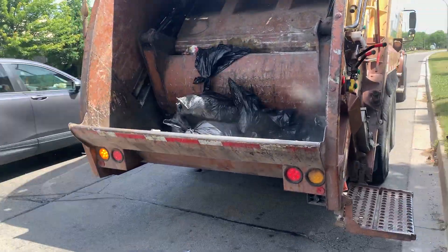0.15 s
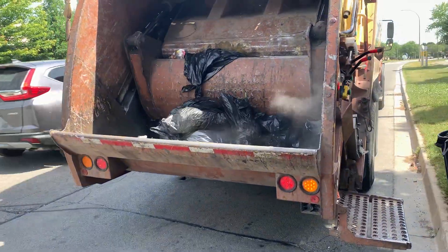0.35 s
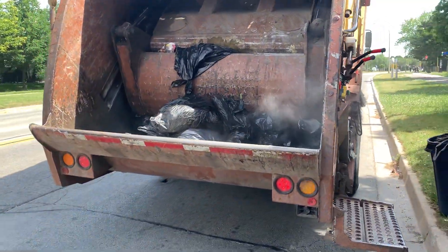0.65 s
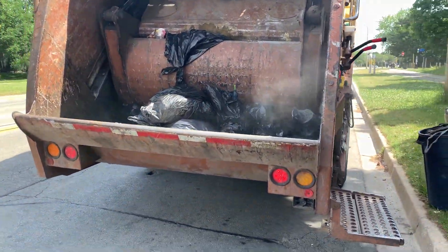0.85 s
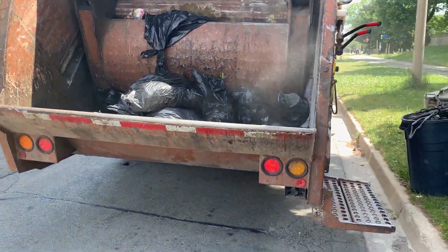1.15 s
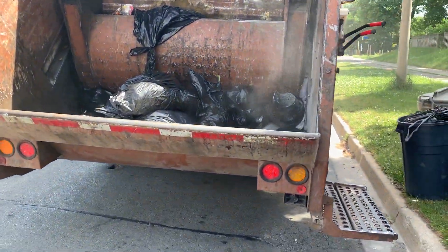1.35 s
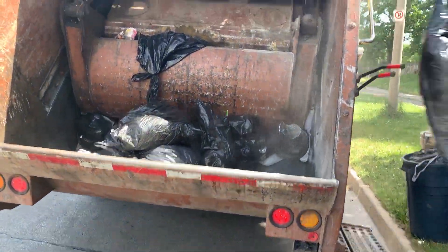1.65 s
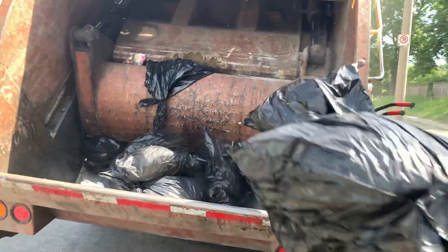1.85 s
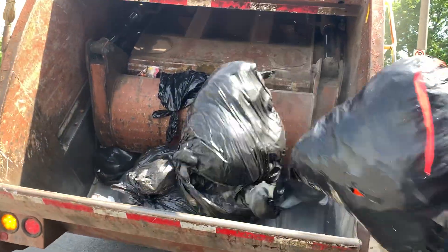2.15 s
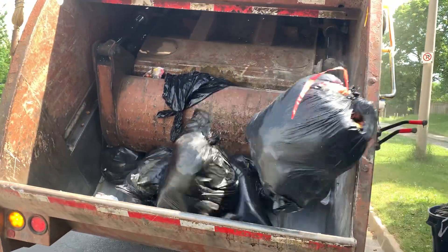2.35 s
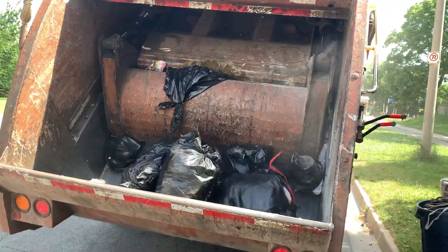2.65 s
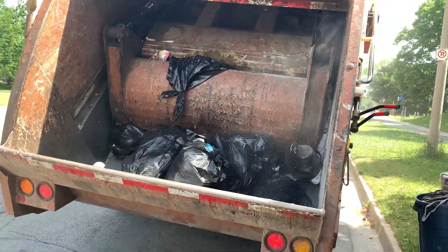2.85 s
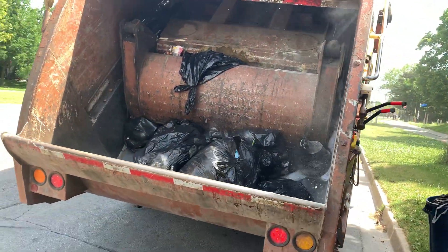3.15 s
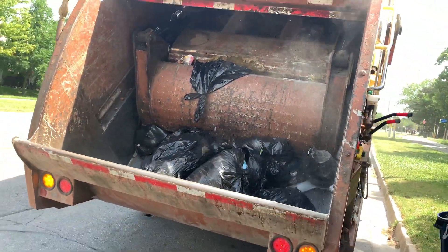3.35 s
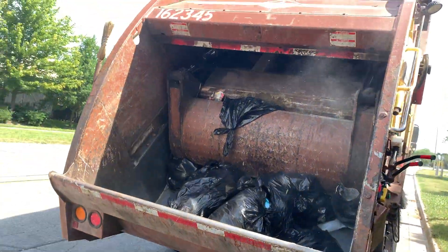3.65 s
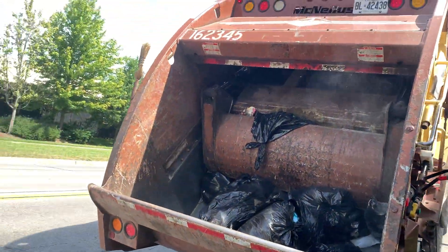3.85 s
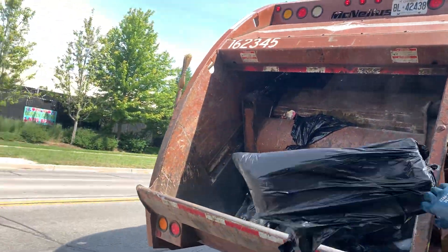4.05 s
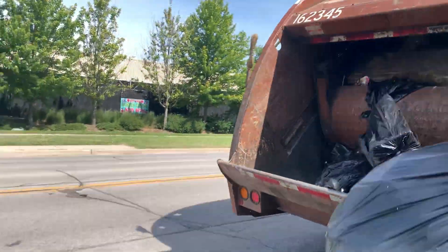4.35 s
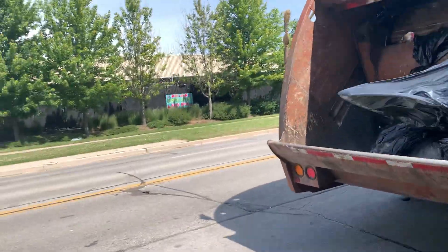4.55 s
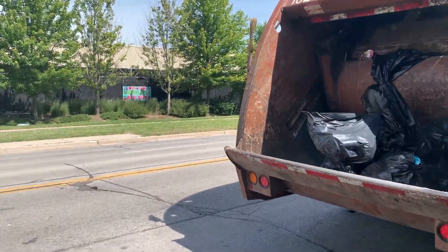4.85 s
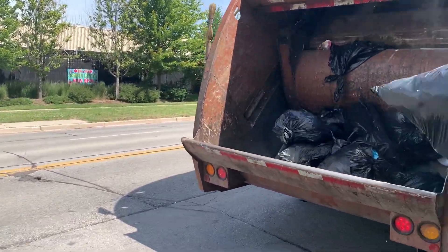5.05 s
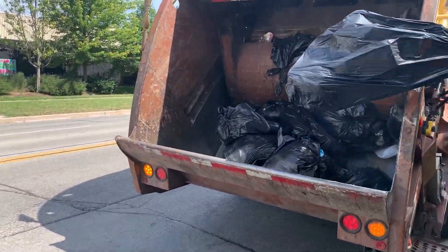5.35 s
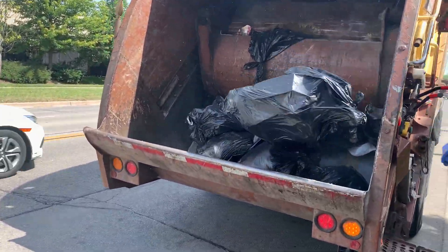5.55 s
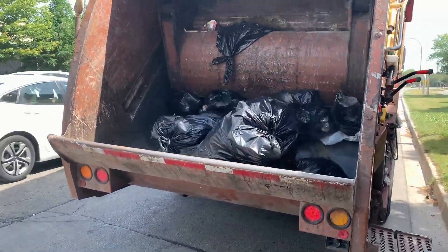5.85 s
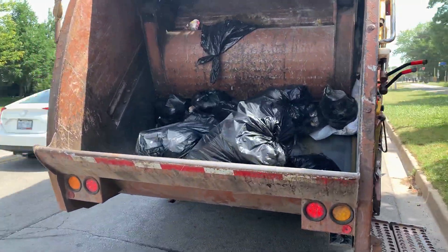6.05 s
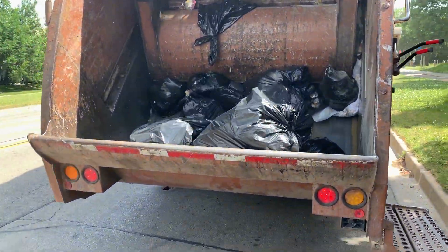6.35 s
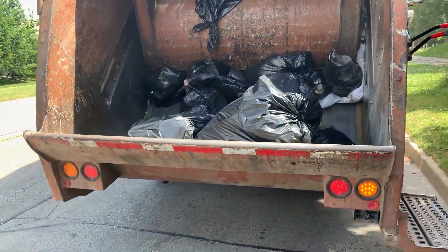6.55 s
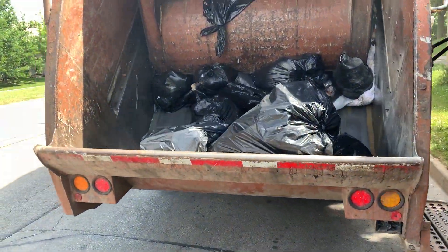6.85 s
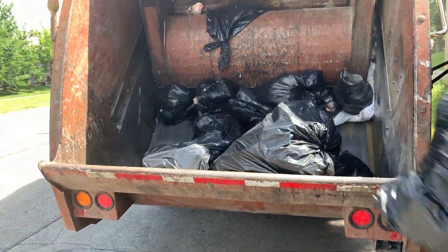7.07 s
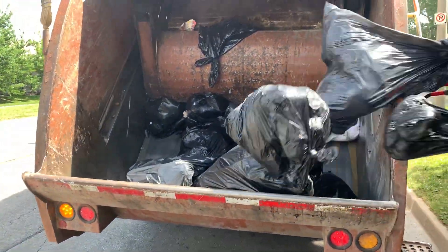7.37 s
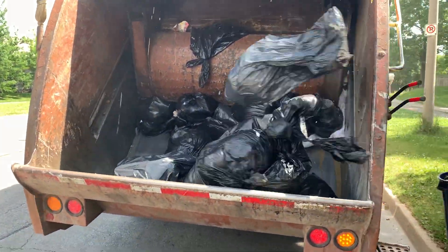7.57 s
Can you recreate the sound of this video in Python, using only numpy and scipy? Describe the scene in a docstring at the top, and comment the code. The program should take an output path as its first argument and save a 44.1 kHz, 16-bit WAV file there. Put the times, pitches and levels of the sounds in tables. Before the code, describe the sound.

Garbage truck engine hums steadily at raised revs outdoors while plastic bags rustle, thud and crunch in a steel hopper, with one brief falling metal squeal.

```python
"""Behind a rear-loading refuse truck, a diesel at raised revs drives a humming pump and a fan: partials of one shaft.
From the outset plastic bags rustle and snap as grains of noise; thrown rubbish soon thuds and crunches
in the steel hopper, as decaying noise and struck resonances.
Next, rubbing on the steel gives one falling stick-slip squeal among short chirps, as gliding tones.
The blows and snaps go on to the end, where the revs sag."""
import sys
import numpy as np
from scipy import signal
from scipy.fft import rfft, irfft, next_fast_len
from scipy.io import wavfile
from scipy.ndimage import uniform_filter1d, map_coordinates

SR = 44100
rng = np.random.default_rng(int(sys.argv[2]) if len(sys.argv) > 2 else 0)


def bounce(signal):
    """Save signal as a 16-bit WAV file at the path given by the first command-line argument."""
    frames = np.transpose(np.atleast_2d(signal))
    limited = np.clip(frames, -1, 1)
    pcm = np.round(limited * 32767).astype(np.int16)
    wavfile.write(sys.argv[1], SR, pcm)


N = 340011

# All levels in the tables are relative: each layer also has a trim of its own.
# Shaft speed, steady and then sagging: (time [s], pump tone [Hz])
SHAFT_SPEED = [(0, 201.2), (1.22, 199.6), (1.63, 200.4), (7.21, 201.3), (7.6, 198.1), (7.71, 191.4)]
# Hum of the driven machines: (time [s], pump level [dB], fan level [dB])
HUM_LEVELS = [(0, -21, -32), (.7, -23, -29), (.95, -26, -39), (1.3, -20, -30), (1.8, -15, -25.5),
              (2.36, -15, -24.5), (2.7, -22, -33), (3.55, -25.5, -45), (4.05, -22, -35), (4.6, -22, -39),
              (5, -19, -32), (6.05, -16, -42), (6.4, -17.5, -24), (6.9, -15.5, -23), (7.35, -18.5, -21.5),
              (7.52, -15, -32), (7.71, -36, -18.5)]
# Broad noise: (time [s], exhaust rumble level [dB], roar of machine and street level [dB])
DRONE_LEVELS = [(0, -24, -28), (1, -22, -27), (1.6, -21.5, -25.5), (2.35, -22.5, -29.5), (2.7, -28.5, -33),
                (3.55, -28.5, -35), (3.85, -29, -32.5), (4.1, -24.3, -33), (5.2, -25.5, -29.5),
                (5.95, -24, -25), (6.6, -22.5, -29.5), (7.35, -21, -29.5), (7.71, -20, -23)]
# Rubbish striking the hopper: (time [s], crunch level [dB], steel body level [dB], fizz level [dB])
HOPPER_BLOWS = [(1.1026, -17, -36, -23), (1.4755, -12, -27.5, -29.5), (1.7669, -10.5, -35, -26),
                (1.821, -18, -22, -21.5), (2.4243, -11.5, -20, -26), (2.8074, -16, -25, -30),
                (2.8727, -17, -29, -33), (3.004, -14, -28.5, -26), (3.6484, -11, -15, -44),
                (3.7809, -16.5, -28, -26.5), (3.95, -22, -32, -42), (4.9067, -19, -20, -38),
                (5.277, -15.5, -24, -40), (5.7162, -12.5, -21, -18.5), (6.6566, -15.5, -39, -22),
                (6.944, -15.5, -46, -30), (7.2436, -18, -25, -36), (7.4995, -18, -35, -28),
                (7.594, -20, -24, -32)]
# Creases of plastic snapping: (time [s], crack level [dB], bright tick level [dB])
CREASE_SNAPS = [(.241, -22, -31.5), (.275, -16, -32), (0.454, -32, -29), (.8612, -24, -38),
                (0.8687, -16, -22.5), (1.235, -16.5, -29), (1.7669, -15, -40), (2.049, -27, -30),
                (4.3164, -17.5, -25.5), (5.0698, -17, -31), (5.2778, -6.5, -18), (6.099, -17, -29.5),
                (6.2593, -16.5, -31), (6.344, -28, -32), (6.356, -24, -30), (6.4014, -12.5, -23),
                (6.6579, -14, -22.5), (6.7115, -10, -26), (6.982, -13, -26), (7.037, -14.5, -26),
                (7.4995, -8, -18.5), (7.5264, -16, -29)]
# Struck contents, from thuds to clinks: (time [s], level [dB], resonance [Hz])
STRUCK_CONTENTS = [(.855, -25, 980), (1.076, -23, 160), (1.767, -26, 2960), (2.166, -14, 99),
                   (2.425, -17.5, 4100), (3.652, -23, 1050), (3.652, -23, 1700), (4.02, -19.5, 340),
                   (4.909, -18, 1060), (5.277, -18, 544), (6.044, -29, 2700), (6.959, -29, 4900),
                   (7.262, -31, 103), (7.3, -15.5, 285), (7.52, -11.5, 92), (7.568, -11.5, 710),
                   (7.583, -17.5, 1070)]
# Exhaust partials: (multiple of the firing rate [1], level [dB])
FIRING_PARTIALS = [(1, -7), (4 / 3, -23), (2, -13), (2.5, -6.5), (4, -19)]
# Pump partials: (multiple of the pump tone [1], level [dB])
PUMP_PARTIALS = [(1, -0.5), (2, -19), (3, -40.5), (4, -35)]
# Fan partials: (multiple of the fan tone [1], level [dB])
FAN_PARTIALS = [(1, 3), (2, -10), (3, -18.5)]
# Spectrum of the exhaust rumble: (frequency [Hz], density [dB per Hz])
RUMBLE_SPECTRUM = [(20, -47), (32, -17), (50, -8.5), (62, -4), (90, 0), (125, -1), (165, 3.5), (215, -3.5),
                   (255, -8.5), (320, -13.5), (380, -7.5), (480, -16.5), (700, -40), (1500, -55)]
# Spectrum of the machine and street roar: (frequency [Hz], density [dB per Hz])
ROAR_SPECTRUM = [(150, -15), (300, 1), (400, 7), (520, 0.5), (780, 1), (1000, 1), (1300, -4), (1700, -13.5),
                 (3000, -25.5), (6000, -32), (16000, -48)]
# Spectrum of crumpling, crunching and snapping: (frequency [Hz], density [dB per Hz])
CRUMPLE_SPECTRUM = [(500, -39), (1300, 1), (2100, 3.5), (3800, -1), (5200, -6.5), (7500, -8), (11000, -17),
                    (16000, -27)]
# Spectrum of sliding hiss, fizz and ticks: (frequency [Hz], density [dB per Hz])
SLIDE_SPECTRUM = [(2000, -25), (4500, -2), (6500, 0), (8500, 3), (10200, 4), (12500, 0.5), (15500, -1),
                  (16500, -19)]
# Modes of the hopper's steel: (centre [Hz], width [Hz], level [dB])
HOPPER_MODES = [(307, 47, 3.5), (600, 99, -2), (780, 151, -0.5), (1060, 260, -1.5), (1306, 160, -1.5),
                (1680, 340, -12)]
# Decay of the hopper's echo: (frequency [Hz], t60 [s])
HOLLOW_DECAY = [(200, 0.61), (1500, 0.093), (6000, 0.12), (15000, 0.073)]
# Correlation of the two sides: (frequency [Hz], left-right likeness [1])
SIDE_LIKENESS = [(60, 1), (200, 0.87), (350, 0.89), (640, 0.42), (1300, -0.22), (3000, 0.038),
                 (5500, -0.0022), (8300, 1), (15000, 0.7)]
# Phase between the two microphone ports: (frequency [Hz], lead of the left [rad])
PORT_PHASE = [(20, 0), (6200, 0), (8600, -3.14), (11000, -6.28), (13450, -9.42), (15900, -12.57)]
# Strokes of sliding, crumpling bags: (middle [s], half length [s], crumple level [dB], hiss level [dB])
BAG_STROKES = [(0.015, 0.044, -46, -37.5), (0.327, 0.066, -52, -45), (.475, 0.033, -54, -40),
               (1.08, 0.17, -39.5, -38), (1.653, 0.26, -44, -41.5), (2.159, 0.034, -32, -28),
               (2.386, 0.055, -30, -26), (2.57, 0.081, -46, -33), (2.893, 0.093, -41, -38),
               (3.077, 0.082, -38, -25.5), (3.85, 0.022, -35.5, -47), (4.07, 0.11, -40, -39),
               (4.49, 0.069, -36.5, -35), (4.72, 0.15, -40.5, -48), (4.99, 0.08, -31, -30),
               (5.2, 0.044, -32.5, -41), (5.55, 0.081, -35, -44), (5.73, 0.051, -32.5, -36),
               (6.071, 0.044, -49, -48), (6.41, 0.092, -37, -41), (6.902, 0.19, -39, -62),
               (7.522, 0.041, -27, -30), (7.683, 0.09, -32.5, -31)]
# The main squeal: (time [s], pitch [Hz], level [dB])
MAIN_SQUEAL = [(2.566, 7780, -21), (2.594, 6850, -20.5), (2.648, 7710, -29), (2.72, 7250, -23.5),
               (2.77, 6570, -24.5), (2.879, 6080, -34), (2.99, 5730, -17.5), (3.03, 5550, -32),
               (3.13, 4050, -35)]
# Brief slips at other contacts: (time [s], length [s], first pitch [Hz], last pitch [Hz], level [dB])
CONTACT_CHIRPS = [(2.308, 0.074, 5900, 7280, -31.5), (2.363, 0.1, 9000, 8800, -16),
                  (2.456, 0.061, 8700, 8840, -17), (2.503, 0.063, 8700, 10200, -19),
                  (2.509, 0.047, 8600, 7850, -20.5), (2.545, 0.053, 9540, 8560, -13),
                  (2.557, 0.032, 11900, 12300, -24), (2.627, 0.051, 10750, 9200, -25),
                  (2.68, .06, 12300, 11900, -35.5), (2.747, 0.15, 11700, 11130, -27),
                  (2.92, .04, 12550, 9900, -29), (2.969, 0.045, 7770, 5750, -23),
                  (3.029, 0.13, 10900, 6670, -22.5), (3.057, 0.3, 13050, 6590, -19)]

TOP_HZ = 16100  # band limit
# steady treble of the running machine: middle and top level, and dB gained per dB of roar
FLOOR_MID_DB, FLOOR_TOP_DB, FLOOR_FOLLOWS = -40, -45, 0.42
CRUNCH_T60_S, BODY_T60_S, FIZZ_T60_S = 0.12, 0.14, 0.13
SNAP_T60_S, TICK_T60_S = 0.025, 0.01
RING_T60_S, RING_FALL = 0.17, 0.19  # t60 at 1 kHz; power by which it shortens with pitch
CHIRP_SETTLE, CHIRP_FADE_DB_PER_S = 2.5, 99  # time constants of the glide within one chirp; loss of level
SQUEAL_DRIFT, DRIFT_PER_S = 0.00496, 60  # uneven rubbing bends the pitch: share of the pitch, bends a second


def shaft_turns():
    """Phase is the integral of frequency: cycles of the pump tone."""
    pump_hz, = curves(SHAFT_SPEED)
    return np.cumsum(pump_hz) / SR


def pump_and_fan(pump_turns):
    """Harmonic series of rotation: the pump, and a belted fan at a fixed ratio to it."""
    pump_db, fan_db = curves(HUM_LEVELS)
    fan_turns = pump_turns * 1.1527
    pump = amp(pump_db - 0.05) * tone(pump_turns, PUMP_PARTIALS, waver_db=.5)
    fan = amp(fan_db - 5) * tone(fan_turns, FAN_PARTIALS, waver_db=2.5)
    return np.sqrt(2) * (pump + fan)


def exhaust(pump_turns):
    """Periodic firing: partials of the firing rate, with noise modulated into puffs, one for each firing."""
    rumble_db, _ = curves(DRONE_LEVELS)
    firings = pump_turns / 3
    beat = amp(rumble_db - 6.0) * tone(firings, FIRING_PARTIALS, waver_db=2.5)
    puffs = 1 + 0.21 * np.cos(2 * np.pi * firings)
    rumble = amp(rumble_db + 1.24) * coloured(noise() * puffs, RUMBLE_SPECTRUM)
    return np.sqrt(2) * beat + spread(rumble)


def rubbish():
    """Impact excitation: clusters of small contacts also ring the hopper's modes; creases snap on their own."""
    grain = unit(5 + 0.67 * crackle(rate=510, size_db=19, life=0.00086))
    crunch_rows = [(s, db) for s, db, _, _ in HOPPER_BLOWS]
    body_rows = [(s, db) for s, _, db, _ in HOPPER_BLOWS]
    fizz_rows = [(s, db) for s, _, _, db in HOPPER_BLOWS]
    snap_rows = [(s, db) for s, db, _ in CREASE_SNAPS]
    tick_rows = [(s, db) for s, _, db in CREASE_SNAPS]
    body = blows(body_rows, BODY_T60_S) * unit(resonant(noise(), HOPPER_MODES))
    crunch_noise = coloured(patchy(depth_db=5) * grain, CRUMPLE_SPECTRUM)
    crunch = amp(-9.0) * blows(crunch_rows, CRUNCH_T60_S) * crunch_noise
    fizz = amp(-5.0) * blows(fizz_rows, FIZZ_T60_S) * coloured(noise() * grain, SLIDE_SPECTRUM)
    snap = amp(-8.5) * blows(snap_rows, SNAP_T60_S) * coloured(noise(), CRUMPLE_SPECTRUM)
    tick = amp(10) * blows(tick_rows, TICK_T60_S) * coloured(noise(), SLIDE_SPECTRUM)
    return spread(body + crunch + fizz + snap + tick)


def thuds():
    """Damped resonance: struck contents boom or clink; low ones start softly and ring longer."""
    out, t = np.zeros((2, N + SR)), np.arange(SR // 2) / SR
    for s, db, hz in STRUCK_CONTENTS:
        t60 = RING_T60_S * (hz / 10 ** 3) ** -RING_FALL
        mode = (hz, 55 + hz * 0.075, 0)
        boom = unit(resonant(rng.standard_normal((2, len(t))), [mode]))
        onset = 1 - np.exp(-t * hz)
        out[:, round(s * SR):][:, :len(t)] += boom * amp(db - 60 * t / t60) * onset
    return spread(out[:, :N]) * amp([[.8], [-.8]])  # a little to the left


def squeal(jitter=0.0027, flutter_db=1.5, overtone_db=-6, rasp_db=-10, fade=0.005):
    """Stick-slip: pitch follows the rubbing speed, several contact spots sing at once, and fast glides rasp."""
    out = np.zeros(N)
    shake, flutter, scrape, drift = wobble(900), wobble(130), wobble(1600), wobble(DRIFT_PER_S)
    for start, pitch, db in glides():
        i = round(start * SR) + np.arange(len(pitch))
        t = i / SR
        # each contact reads the random curves from its own place
        other = (i + rng.integers(N)) % N
        bent_pitch = pitch * (1 + jitter * shake[other] + SQUEAL_DRIFT * drift[other])
        phase = 2 * np.pi * np.cumsum(bent_pitch) / SR
        gate = np.clip(np.minimum(t - t[0], t[-1] - t) / fade, 0, 1)
        octave = amp(overtone_db) * (pitch < TOP_HZ / 2) * np.sin(2 * phase)
        slip = np.clip(np.abs(np.gradient(pitch)) * SR / 25000, .3, 2)
        rasp = amp(rasp_db) * slip * scrape[other] * np.cos(phase)
        level = amp(db + 1.0 + flutter_db * flutter[other])
        out[i] += gate * level * (np.sin(phase) + octave + rasp)
    return out


def glides():
    """Exponential relaxation: (start s, pitch Hz, level dB) of the squeal and of each settling, fading chirp."""
    s, hz, db = np.transpose(MAIN_SQUEAL)
    t = np.arange(s[0], s[-1], 1 / SR)
    out = [(s[0], np.interp(t, s, hz), np.interp(t, s, db))]
    for start, length, first_hz, last_hz, level_db in CONTACT_CHIRPS:
        t = np.arange(0, length, 1 / SR)
        settled = np.expm1(-CHIRP_SETTLE * t / length) / np.expm1(-CHIRP_SETTLE)
        pitch = first_hz + (last_hz - first_hz) * settled
        out.append((start, pitch, level_db - CHIRP_FADE_DB_PER_S * t))
    return out


def bags():
    """Granular friction: film crumples in grains and coarser cracks, and hisses as it slides, over machine hiss."""
    _, roar_db = curves(DRONE_LEVELS)
    drift_db = FLOOR_FOLLOWS * (roar_db - roar_db.mean()) + 0.27 * wobble(10)
    crumple = swells([(s, half, db) for s, half, db, _ in BAG_STROKES], FLOOR_MID_DB + drift_db)
    slide = swells([(s, half, db) for s, half, _, db in BAG_STROKES], FLOOR_TOP_DB + drift_db)
    # coarse cracks come only while the film is worked hard
    effort = np.clip((20 * np.log10(crumple) + 35.6) / 8, 0, 1)
    fine = unit(1 + .5 * crackle(rate=470, size_db=3.5, life=0.002))
    grain = fine + 0.43 * effort * crackle(rate=88, size_db=8, life=0.0037)
    crumpling = crumple * coloured(patchy(depth_db=3.5) * grain, CRUMPLE_SPECTRUM)
    sliding = slide * coloured(patchy(depth_db=3.0) * grain, SLIDE_SPECTRUM)
    return spread(crumpling + sliding)


def hollow(x):
    """Reverberation: the open steel hopper answers with a short tail, its decay set by frequency."""
    hz, t, z = signal.stft(rng.standard_normal((2, SR // 2)), SR, nperseg=256)
    decay = amp(-60 * t / along(HOLLOW_DECAY, hz)[:, None])
    tail = signal.istft(z * decay, SR, nperseg=256)[1]
    tail = tail / np.linalg.norm(tail[0])
    return spread(signal.fftconvolve(x[None], tail, axes=1)[:, :N])


def roar():
    """Broadband superposition: machine and street merge into coloured noise with uneven, shifting bands."""
    _, roar_db = curves(DRONE_LEVELS)
    level = amp(roar_db + 1.0 + 0.61 * wobble(12))
    sound = level * coloured(patchy(depth_db=3.0, size=2048), ROAR_SPECTRUM)
    # the open street lies to the left
    return spread(sound) * amp([[1.3], [-1.3]])


def tone(turns, orders, waver_db):
    """Phase locking: partials tied to a shaft, each wavering a little."""
    return sum(amp(db + waver_db * wobble(7)) * np.sin(2 * np.pi * (k * turns + rng.random()))
               for k, db in orders)


def crackle(rate, size_db, life):
    """Shot noise: rms-1 envelope of tiny creases, rate a second, their energy decaying over life seconds."""
    draws = rng.random((2, N))
    sizes = (draws[0] < rate / SR) * amp(-size_db * np.log(draws[1] + 0.0057))
    energy = signal.lfilter([1], [1, -np.exp(-1 / (life * SR))], sizes ** 2)
    return unit(np.sqrt(energy))


def blows(rows, t60, attack=0.00038):
    """Exponential decay: envelope of sudden blows, their energies added; rows are (time [s], level [dB])."""
    env, t = np.zeros(N + SR), np.arange(SR // 2) / SR
    for s, db in rows:
        blow = amp(db - 60 * t / max(t60, .002)) * (1 - np.exp(-t / attack))
        env[round(s * SR):][:len(t)] += blow ** 2
    return np.sqrt(env[:N])


def swells(rows, floor_db):
    """Energy addition: bell-shaped strokes over a floor; rows are (time [s], half length [s], level [dB])."""
    t = np.arange(N) / SR
    strokes = sum(amp(db) ** 2 * np.exp(-((t - s) / half) ** 2) for s, half, db in rows)
    return np.sqrt(amp(floor_db) ** 2 + strokes)


def patchy(depth_db, size=512):
    """Random band levels: stereo noise in which narrow bands come and go."""
    z = signal.stft(noise(), nperseg=size)[2]
    field = uniform_filter1d(rng.standard_normal(z.shape[1:]), size=2, axis=0)  # across frequency
    field = uniform_filter1d(field, size=12, axis=1)  # along time
    return unit(signal.istft(z * amp(depth_db * unit(field)), nperseg=size)[1][:, :N])


def resonant(x, modes):
    """Modal superposition: x through a bank of resonances with alternating sign."""
    def response(f):
        return sum((-1) ** k * amp(db) * 1j * f * w / (c * c - f * f + 1j * f * w)
                   for k, (c, w, db) in enumerate(modes))
    return filtered(x, response)


def spread(pair):
    """Interaural correlation: bass and top reach both ears alike; the middle range is diffuse."""
    def turn(hz):
        return np.arccos(np.clip(along(SIDE_LIKENESS, hz), -.99, .99)) / 2
    mid, side = filtered(pair, lambda hz: np.array([np.cos(turn(hz)), np.sin(turn(hz))]))
    return np.array([mid + side, mid - side])


def coloured(x, spectrum):
    """Spectral shaping: x filtered by a given spectrum, at rms 1."""
    return unit(filtered(x, lambda hz: amp(along(spectrum, hz))))


def filtered(x, response):
    """Linear filtering: the spectrum of x times a complex response of frequency."""
    n = x.shape[-1]
    m = next_fast_len(n + 8192)
    return irfft(rfft(x, m) * response(np.fft.rfftfreq(m, 1 / SR)), m)[..., :n]


def noise():
    """Incoherence: two unrelated white noises, one for each side."""
    return rng.standard_normal((2, N))


def wobble(rate):
    """Band-limited fluctuation: a smooth random curve, rate knots a second."""
    return map_coordinates(rng.standard_normal(int(N * rate / SR) + 4), [np.arange(N) * rate / SR])


def curves(rows):
    """Linear interpolation: one value per sample for each column after the time."""
    s, *cols = np.transpose(rows)
    return [np.interp(np.arange(N) / SR, s, c) for c in cols]


def along(points, hz):
    """Logarithmic frequency: (frequency [Hz], value) points interpolated on a log axis."""
    f, v = np.transpose(points)
    return np.interp(np.log(hz + 1), np.log(f + 1), v)


def unit(x):
    """Normalisation: scale to rms 1."""
    return x / np.sqrt(np.mean(x ** 2) + 1e-20)


def amp(db):
    """Logarithmic level: decibels to gain."""
    return 10 ** (np.asarray(db) / 20)


def scene():
    """Superposition: the truck, the rubbish and bags, the squeal, the hopper's echo and the roar."""
    pump_turns = shaft_turns()
    truck = pump_and_fan(pump_turns) + exhaust(pump_turns)
    hits, squeak = rubbish(), squeal()
    echo = hollow(amp(-4.0) * hits[0] + amp(-2) * squeak)
    return truck + hits + thuds() + squeak + bags() + echo + roar()


def record(dry):
    """Phase difference: treble reaches two microphone ports out of step; nothing passes the band limit."""
    def response(hz):
        lead = np.interp(hz, *np.transpose(PORT_PHASE)) / 2
        return np.exp(1j * np.array([lead, -lead])) * (hz < TOP_HZ)
    return filtered(dry, response)


dry = scene()
out = record(dry)
bounce(out)
```